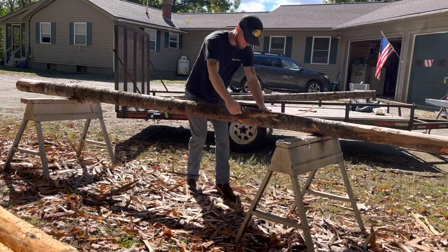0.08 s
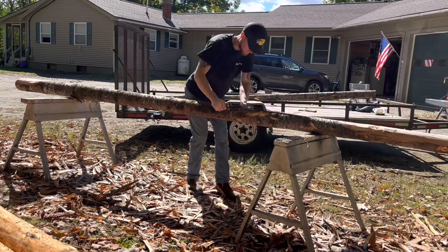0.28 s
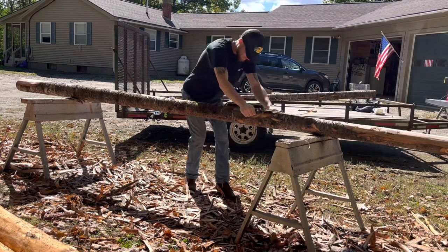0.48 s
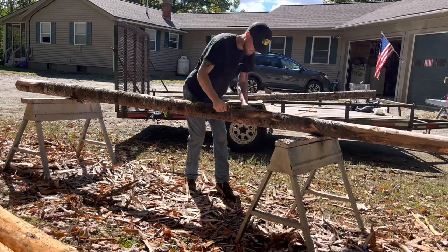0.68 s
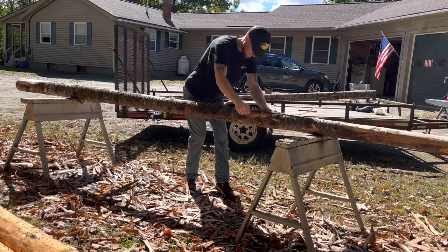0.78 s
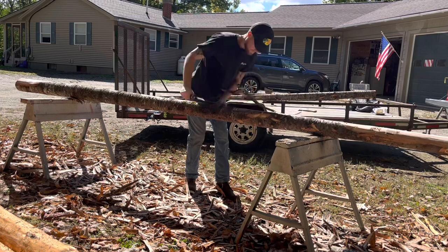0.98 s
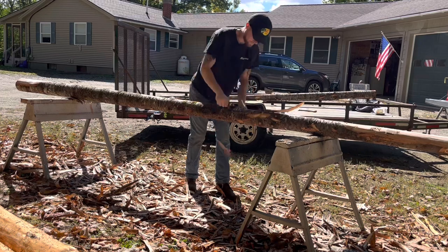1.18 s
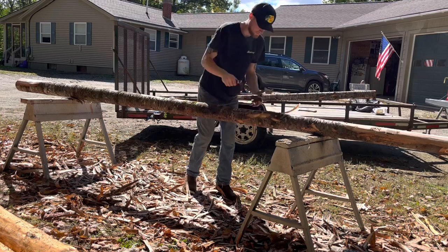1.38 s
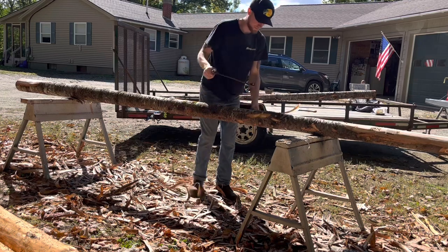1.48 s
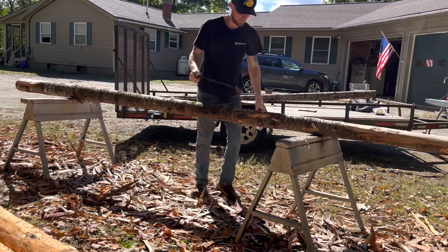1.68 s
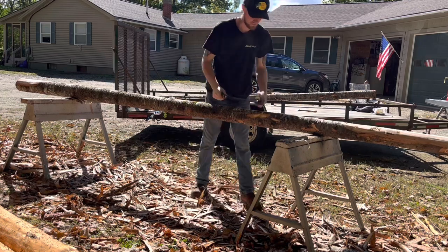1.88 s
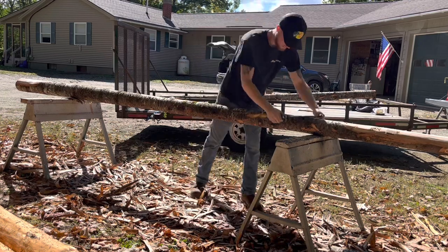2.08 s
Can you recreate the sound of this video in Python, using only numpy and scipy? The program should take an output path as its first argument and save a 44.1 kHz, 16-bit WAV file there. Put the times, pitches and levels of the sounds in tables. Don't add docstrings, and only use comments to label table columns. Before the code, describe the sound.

A drawknife scrapes bark from a log: thin hiss, then bright cracks with short hollow wood ring at each knot, gritty tearing between them, then near quiet with faint ticks; close stereo microphone in an open yard.

```python
import sys
import numpy as np
from scipy import signal
from scipy.fft import rfft, irfft, next_fast_len
from scipy.io import wavfile

SR = 44100
rng = np.random.default_rng(int(sys.argv[2]) if len(sys.argv) > 2 else 0)


def gain_from_db(level_db):
    decades = np.asarray(level_db, float) / 20
    return 10 ** decades


def unload_audio(sound):
    columns = np.transpose(np.atleast_2d(sound))
    steps = np.round(np.clip(columns, -1, 1) * 32767)
    wavfile.write(sys.argv[1], SR, steps.astype(np.int16))


N = 92610
T = np.arange(N) / SR


def rms_one(x):
    return x / np.sqrt(np.mean(x ** 2) + 1e-20)


def at_hz(points, hz):
    table = np.array(points)
    return np.interp(np.log(hz), np.log(table[:, 0]), table[:, 1])


def drift(rate_hz):
    step = 40
    r = np.exp(-2 * np.pi * rate_hz * step / SR)
    slow = signal.lfilter([1], [1, -2 * r, r * r], rng.standard_normal(N // step + 2002))[2000:]
    return np.interp(np.arange(N) / step, np.arange(len(slow)), rms_one(slow))


def resonate(x, hz, width_hz):
    r = np.exp(-np.pi * width_hz / SR)
    zeros = np.array([1, 0, -1]) * (1 - r * r) / 2
    poles = [1, -2 * r * np.cos(2 * np.pi * hz / SR), r * r]
    return signal.lfilter(zeros, poles, x + 1e-18)


def body(x, peaks):
    return sum((-1) ** k * gain_from_db(db) * resonate(x, hz, width) for k, (hz, width, db) in enumerate(peaks))


def swell(s, rise, t60):
    attack = np.clip(1 + (T - s) / max(rise, 1e-4), 0, 1) ** 2
    return attack * gain_from_db(-60 * np.maximum(T - s, 0) / max(t60, 1e-3))


def bands(length):
    edges = 30 * 2 ** np.arange(0, 9.4, .5)
    white = rng.standard_normal((2, 2, length))
    out = []
    for k, (a, b) in enumerate(zip(edges, edges[1:])):
        sos = signal.butter(2, [a, b], "band", fs=SR, output="sos")
        out.append((np.sqrt(a * b), signal.sosfilt(sos, white[k % 2])))
    return out


def spread(pair, alike):
    alike = np.clip(alike, -1, 1)
    return np.sqrt(1 + alike) * pair[0] + np.sqrt(1 - alike) * pair[1] * [[1], [-1]]


def background():
    # (frequency [Hz], density [dB per Hz])
    air_density = [(15, -95), (25, -85), (102, -5), (229, -6), (301, -15.5), (326, -9.5), (8590, -20),
                   (13200, -26.5), (16000, -64)]
    # (frequency [Hz], likeness [-1 to 1])
    likeness = [(60, 0.95), (240, 1), (950, 0.36), (3770, 0.024), (15000, 0.78)]
    far_lag = 10
    slow = drift(0.75)
    air = 0
    for hz, pair in bands(N):
        level_db = at_hz(air_density, hz) + 0.27 * slow + 0.54 * drift(9)
        air = air + gain_from_db(level_db) * spread(pair, at_hz(likeness, hz))
    air = signal.sosfilt(signal.butter(12, 13800, fs=SR, output="sos"), air)
    hum_hz = 299 + 2.0 * drift(4.05)
    hum = gain_from_db(-55.5 + 0.5 * drift(12)) * np.sin(2 * np.pi * np.cumsum(hum_hz) / SR)
    far = gain_from_db(-52.5) * rms_one(air) + hum
    return np.stack([far[0], np.roll(far[1], far_lag)])


def yard(x):
    # (frequency [Hz], t60 [s])
    yard_t60 = [(200, 0.58), (1000, 0.45), (4000, 0.46), (12000, 0.84)]
    # (frequency [Hz], level [dB])
    yard_db = [(200, -37), (1000, -49.5), (4000, -56.5), (12000, -59.5)]
    # (frequency [Hz], left-right likeness [-1 to 1])
    yard_alike = [(350, .97), (700, .6)]
    t = np.arange(SR // 2) / SR
    tail = 0
    for hz, pair in bands(len(t)):
        decay = gain_from_db(at_hz(yard_db, hz) - 60 * t / at_hz(yard_t60, hz))
        tail = tail + decay * spread(pair, at_hz(yard_alike, hz))
    return signal.fftconvolve(x[None], tail * np.clip(t / 0.0021, 0, 1), axes=1)[:, :N]


def ports(x):
    # (frequency [Hz], lead of left [rad])
    port_phase = [(250, -0.25), (600, 0.24), (1100, 0.64), (2000, 0.98), (4000, 0.28), (6500, -0.68),
                  (13000, -1.27)]
    size = next_fast_len(N + 4096)
    hz = np.maximum(np.arange(size // 2 + 1) * SR / size, 1)
    turn = at_hz(port_phase, hz) / 2
    return irfft(rfft(x, size) * np.exp(1j * turn * [[1], [-1]]), size)[:, :N]


def ticks():
    tick_s = [.349, .3535, .5899, .5931, .7225, .926, 1.0535, 1.825, 1.8515, 1.246]
    # (peak level [dB], pitch [Hz])
    crumbs = [(-23, 5000), (-19, 5000), (-9, 8000), (-4, 8000), (-26, 6000), (-17, 2200), (-28, 7500),
              (-38, 1800), (-40, 2500), (-40, 3000)]
    out = 0
    for s, (db, hz) in zip(tick_s, crumbs):
        impulse = 1.0 * (np.arange(N) == int(s * SR))
        click = resonate(impulse, hz, 1.2 * hz)
        out = out + gain_from_db(db) * click / click.max()
    return out


def grains():
    snaps_per_s, spread_db = 7000, 3.4
    sizes = gain_from_db(spread_db * np.minimum(rng.exponential(1, N), 5)) * rng.choice([-1, 1], N)
    return rms_one(sizes * (rng.random(N) < snaps_per_s / SR))


def slides():
    # (start [s], end [s], level [dB])
    runs = [
        (0.219, 0.272, -37.5),
        (0.545, 0.608, -41),
        (0.887, 0.917, -41),
    ]
    # (frequency [Hz], width [Hz], level [dB])
    slide_peaks = [(4350, 6000, -7.5), (6750, 930, -9.5), (7280, 170, -1), (10100, 1100, -3),
                   (12600, 1300, -8)]
    env = 0
    for a, b, db in runs:
        growth = gain_from_db(3 * (T - b) / (b - a) * (T > a))
        env = env + gain_from_db(db) * np.clip((T - a) / 0.018, 0, 1) * growth * (T < b)
    hiss = rms_one(body(grains(), slide_peaks))
    drag = rms_one(resonate(grains(), 420, 830))
    return env * (hiss + gain_from_db(-5.5) * drag)


def scrapes():
    # (time of peak [s], rise [s], fall t60 [s], grit level [dB], log rumble level [dB])
    tears = [(0.036, 0.045, 0.19, -43, -39), (0.352, 0.021, 0.077, -28.5, -43.5),
             (0.383, 0.06, 0.12, -46.5, -37), (.435, 0.034, .15, -46, -41), (0.486, 0.007, 0.036, -52, -47),
             (.7, 0.0045, 0.067, -45, -67), (0.708, .005, 0.28, -39, -42.5),
             (.716, 0.0051, 0.19, -56, -36.5), (0.723, 0.0028, 0.13, -44.5, -44),
             (0.798, 0.013, 0.41, -46.5, -37), (0.808, 0.017, 0.044, -36, -31.5),
             (0.994, 0.023, 0.08, -68, -40.5), (1.248, .008, .2, -51, -60),
             (1.52, 0.045, 0.12, -58.5, -58.5), (1.829, 0.01, 0.094, -56, -52),
             (2.03, 0.027, 0.45, -66, -53.5)]
    # (frequency [Hz], width [Hz], level [dB])
    grit_peaks = [(1740, 1270, -4.5), (3950, 560, 4), (4740, 650, 4.5), (6640, 5400, -10.5),
                  (9870, 530, -3), (12800, 3800, -14.5)]
    lumps = gain_from_db(1.84 * drift(80))
    blade = rms_one(body(grains(), grit_peaks))
    grit = sum(gain_from_db(db) * swell(s, rise, t60) for s, rise, t60, db, _ in tears) * lumps * blade
    low = sum(gain_from_db(db) * swell(s, rise, t60) for s, rise, t60, _, db in tears) * lumps
    thud = rms_one(body(grains(), [(227, 267, 1), (830, 2400, -7.5)]))
    rumble = gain_from_db(-1) * low * grains()
    return grit + gain_from_db(-1.5) * low * thud, rumble


def knocks():
    knock_s = [.2492, .5899, .5931, .9199, .99, 1.989, 2.022, 2.048]
    # (crack level [dB], crack brightness [dB], log ring level [dB], centre of ring [Hz])
    jams = [
        (-10, 7, -27, 1190),
        (-5.5, 0, -26, 1074),
        (-8, -6.5, -28, 1160),
        (-5.5, 1.5, -26, 1305),
        (-57, 0, -48.5, 890),
        (-67, 0, -48.5, 770),
        (-62, 0, -52, 560),
        (-58, 0, -57, 830),
    ]
    return [(s, *row) for s, row in zip(knock_s, jams)]


def log_ring(rumble):
    # (frequency [Hz], level [dB], t60 [s])
    modes = [(260, -8, .13), (328, -11, .12), (376, -7, .14), (478, -12, .11), (637, -11, .4),
             (812, -10, .1), (1008, -3, .11), (1198, 0, .075), (1290, -4, .045), (1405, -7, .06),
             (1580, -1, .08), (1810, -4, .06), (2170, -9, .05), (2590, -13, .04)]
    hits = knocks()
    out, luck = 0, rng.standard_normal((len(hits), len(modes), 2))
    for k, (hz, db, t60) in enumerate(modes):
        lag = .004 + .007 * max(np.log2(1000 / hz), 0)
        push = 0
        for j, (s, _, _, ring_db, centre_hz) in enumerate(hits):
            tilt_db = max(-6 * (np.log2(hz / centre_hz) / .6) ** 2, -11.5)
            level = gain_from_db(ring_db + 0.99 * luck[j, k, 0] + tilt_db)
            tone = np.sin(2 * np.pi * hz * T + 3 * luck[j, k, 1])
            push = push + level * swell(s + lag, lag, .018) * tone
        width_hz = np.log(1000) / np.pi / t60
        force = push * 200 / width_hz + rumble * gain_from_db(8)
        out = out + gain_from_db(db + 1.8 * drift(42)) * resonate(force, hz, width_hz)
    return out


def crunch():
    wood = grains()
    splinters = rms_one(resonate(resonate(grains(), 4000, 4640), 4000, 4640))
    thump = rms_one(resonate(grains(), 195, 230))
    out = 0
    for s, _, _, db, hz in knocks()[:4]:
        knock = rms_one(resonate(resonate(wood, hz, 1.05 * hz), hz, 1.05 * hz))
        burst = gain_from_db(4) * swell(s + 0.0031, 0.0052, 0.075) * knock
        burst = burst + gain_from_db(-11.5) * swell(s + 0.0013, 0.0015, 0.2) * splinters
        burst = burst + gain_from_db(-18.5) * swell(s + 0.023, 0.045, 0.16) * thump
        out = out + gain_from_db(db) * burst
    return out


def cracks():
    # (frequency [Hz], width [Hz], level [dB])
    crack_peaks = [(4800, 3060, 4.5), (5590, 2500, 0.5), (10250, 500, -12), (11500, 940, -2),
                   (14800, 790, -0.5)]
    t60_s = 0.0088
    noise = rng.standard_normal(N)
    low = sum(gain_from_db(db - bright / 2) * swell(s, 0.0018, t60_s) for s, db, bright, _, _ in knocks())
    high = sum(gain_from_db(db + bright / 2) * swell(s, 0.00062, t60_s) for s, db, bright, _, _ in knocks())
    low_crack = resonate(body(noise * low, crack_peaks[:2]), 4800, 3300)
    return gain_from_db(2.5) * low_crack + body(noise * high, crack_peaks[2:])


def scene():
    grit, rumble = scrapes()
    work = cracks() + crunch() + log_ring(rumble) + grit + slides() + ticks()
    direct = ports(work * gain_from_db([[.2], [-.2]]))
    return direct + yard(work) + background()


def roll_off(x):
    return signal.sosfilt(signal.butter(12, 16800, fs=SR, output="sos"), x)


def record(dry):
    top = signal.sosfilt(signal.butter(12, 14430, fs=SR, output="sos"), dry)
    mix = signal.sosfilt(signal.butter(2, 60, "high", fs=SR, output="sos"), top)
    return roll_off(mix)


dry = scene()
out = record(dry)
unload_audio(out)
```